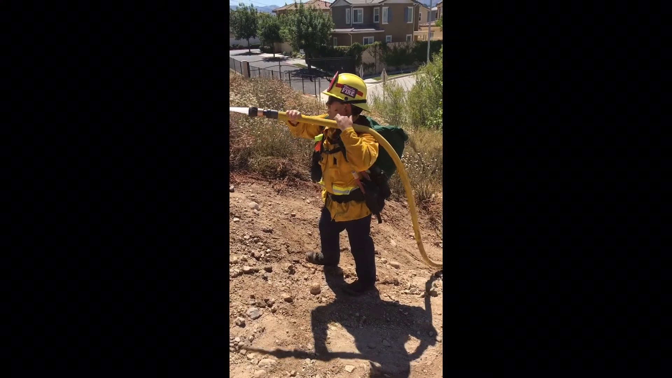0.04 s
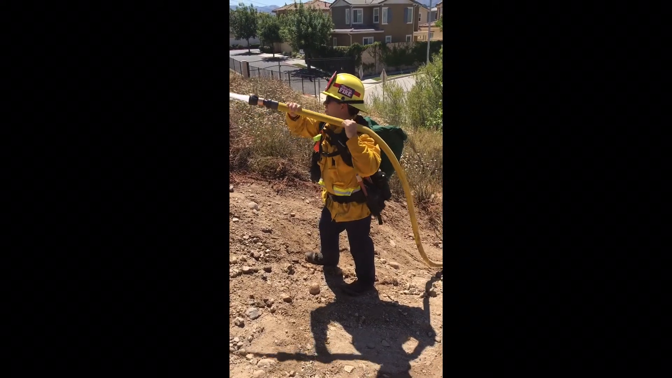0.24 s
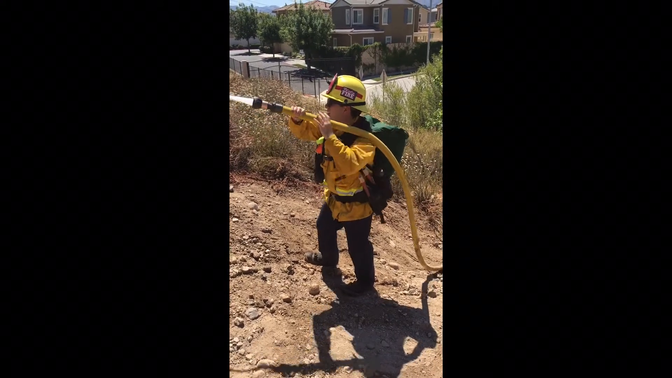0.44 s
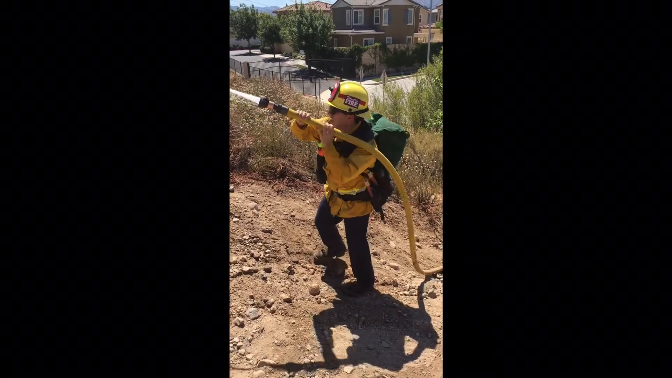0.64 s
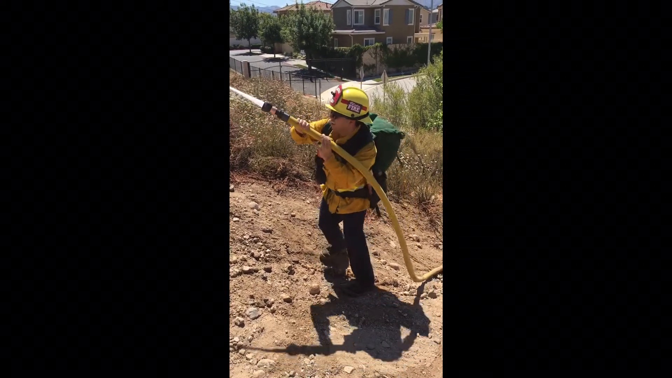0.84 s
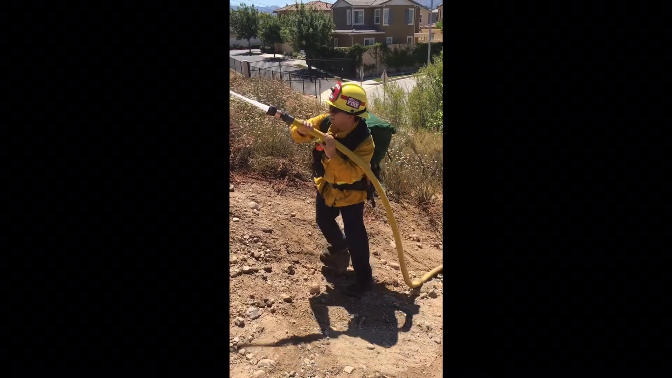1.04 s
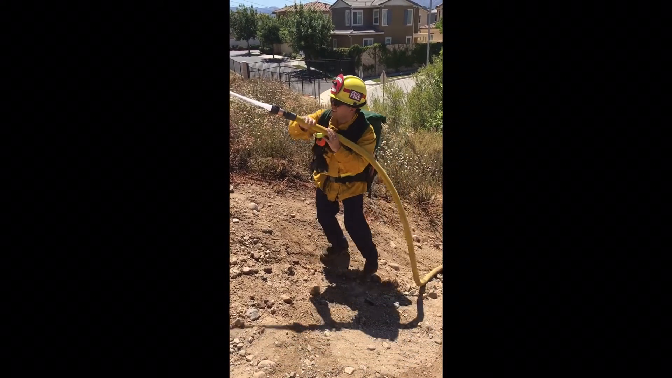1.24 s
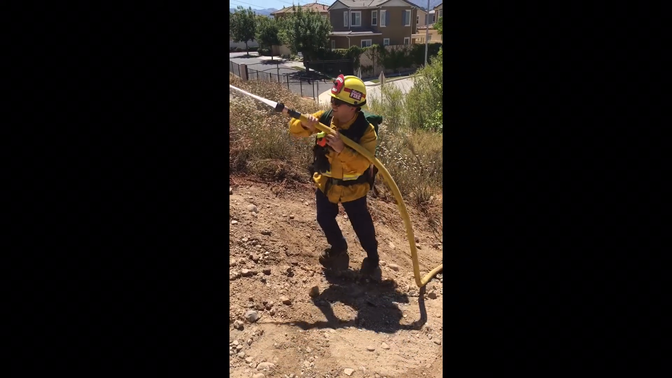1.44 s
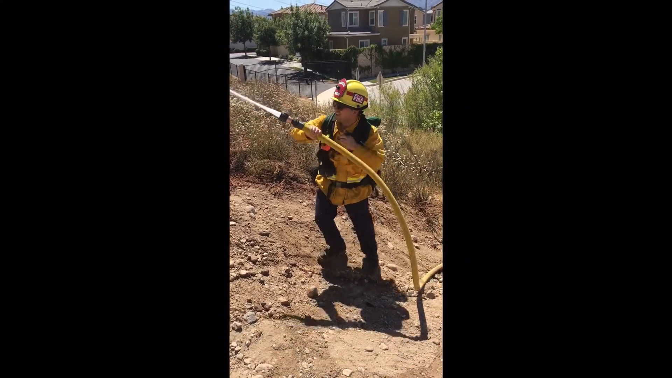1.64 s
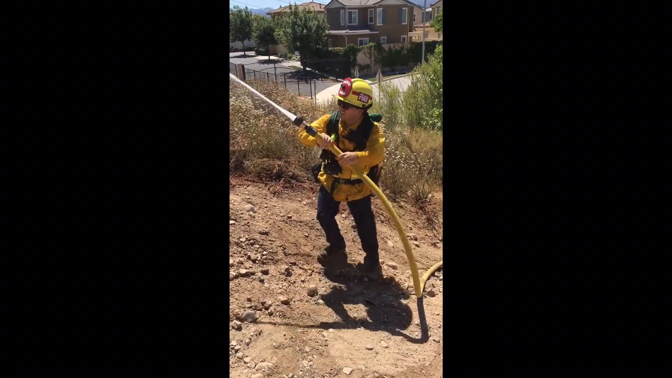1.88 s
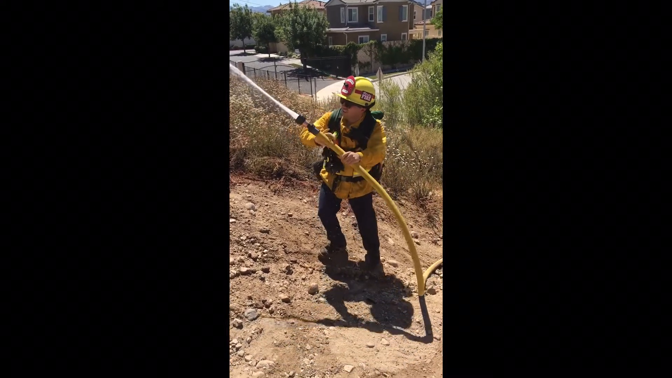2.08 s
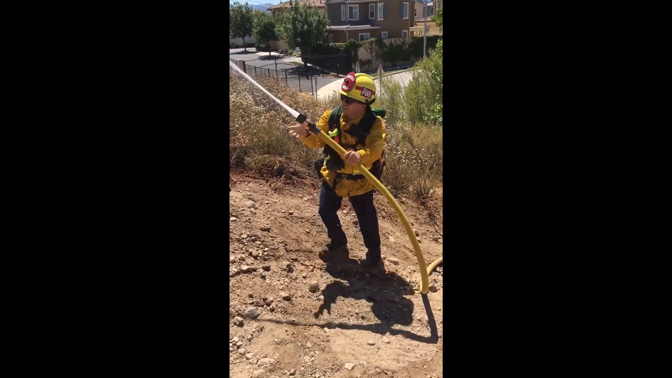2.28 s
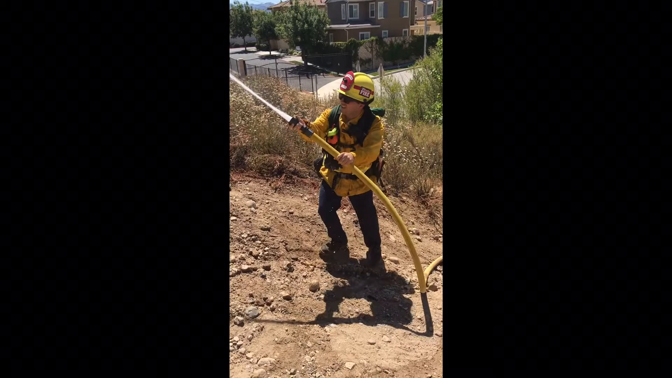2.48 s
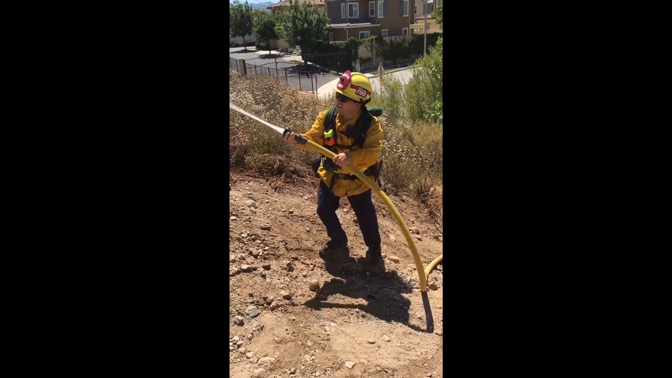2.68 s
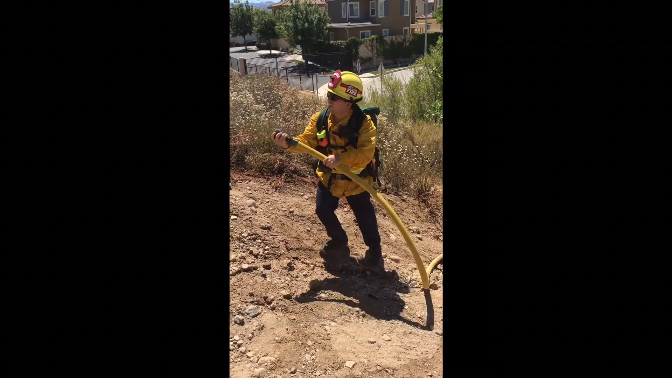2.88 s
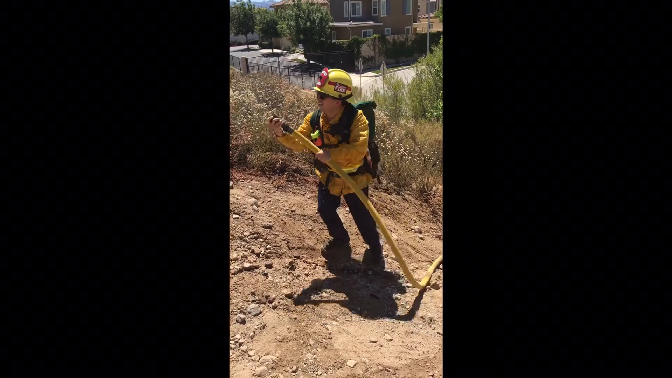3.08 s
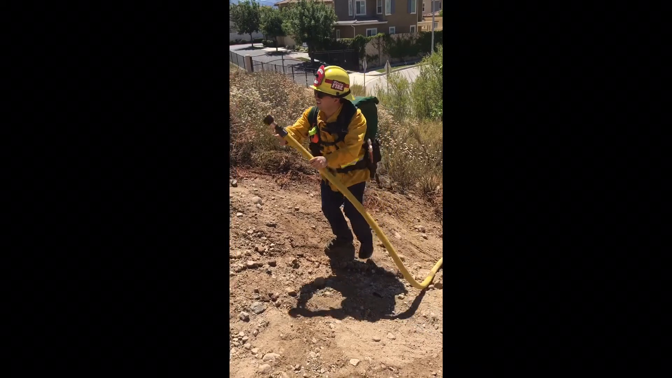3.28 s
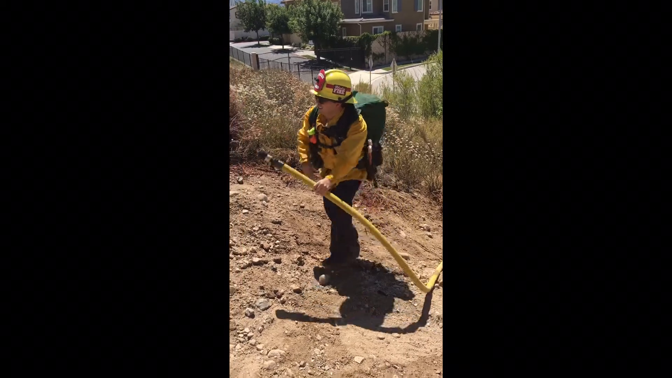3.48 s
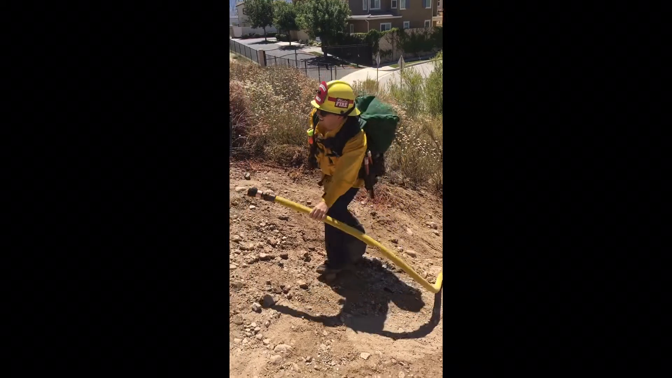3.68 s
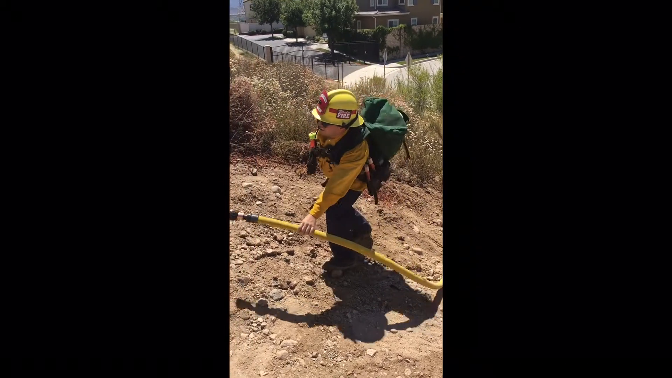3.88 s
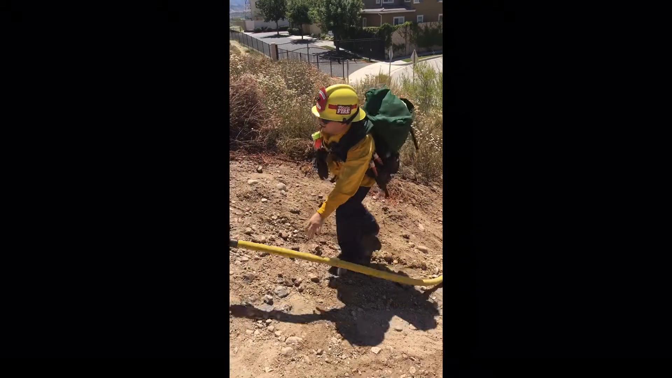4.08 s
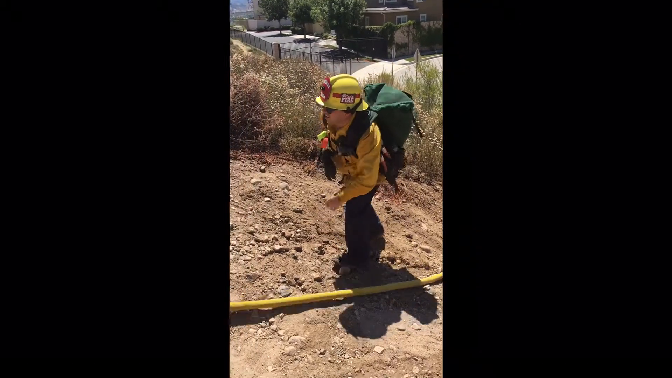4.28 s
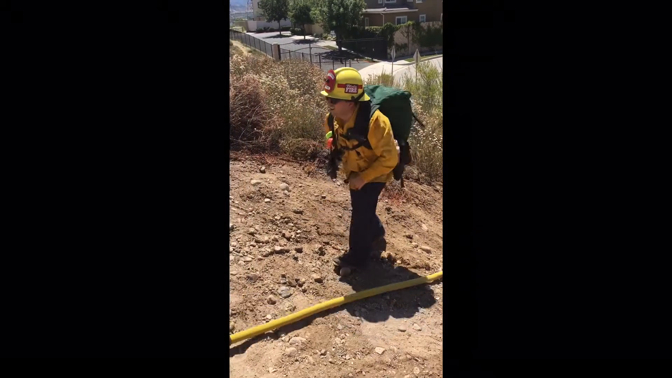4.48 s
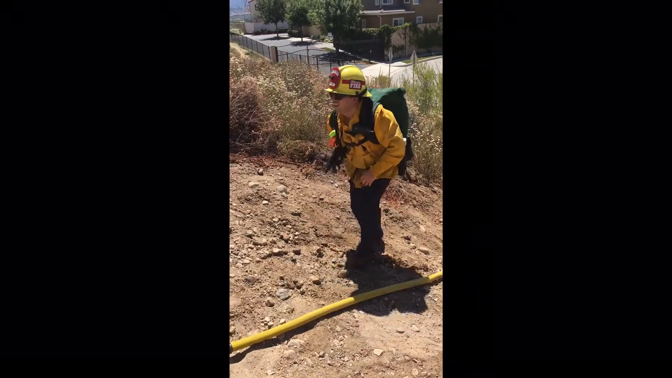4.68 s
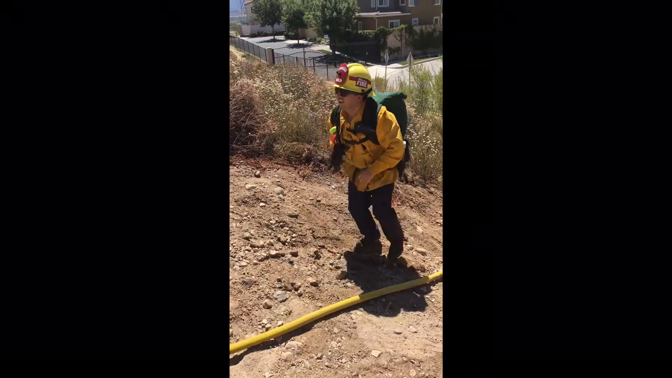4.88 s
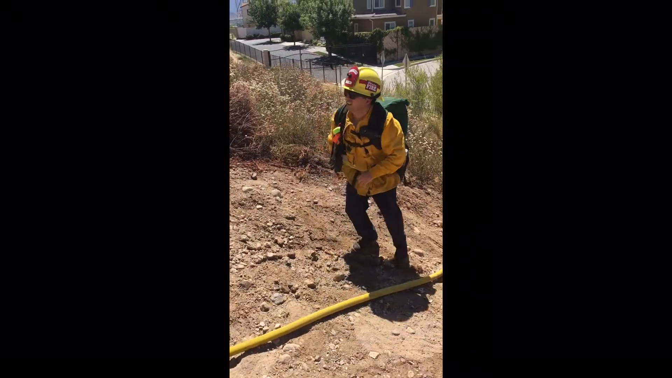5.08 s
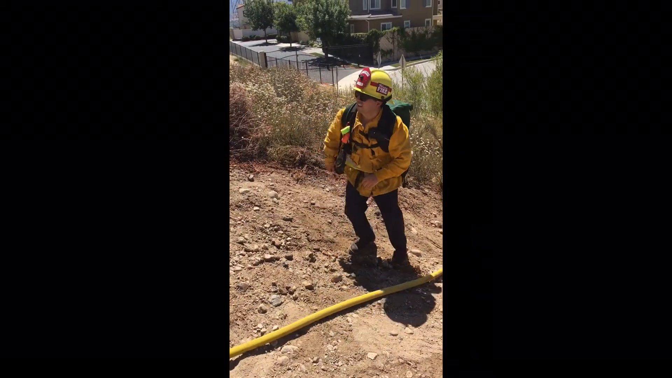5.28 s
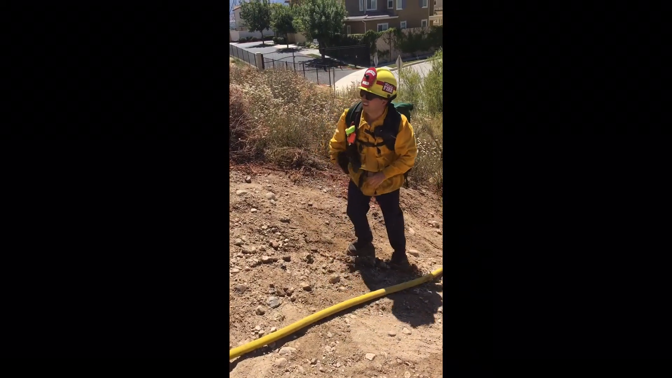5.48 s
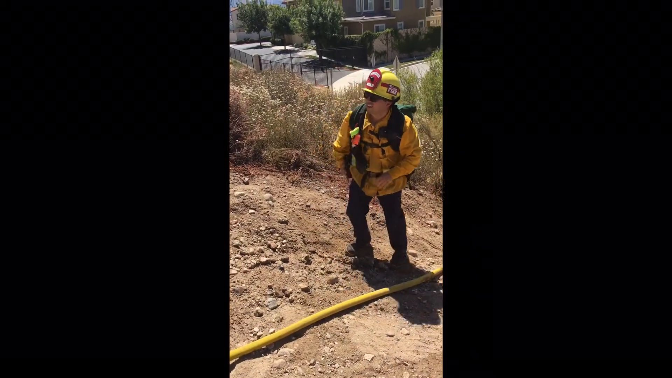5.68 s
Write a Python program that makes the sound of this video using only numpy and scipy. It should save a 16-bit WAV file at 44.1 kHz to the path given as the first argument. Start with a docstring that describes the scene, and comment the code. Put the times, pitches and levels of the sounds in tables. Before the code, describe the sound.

A hose jet hisses steadily from the start, heard through one microphone outdoors on a dry slope. A metal clip clinks at about 0.1 seconds and more brightly at 0.8, and light knocks of gear and stones come through the first 1.2 seconds. Near 2.8 seconds the valve shuts: the hiss thins, splutters briefly and stops. A few faint drops tick on the ground until about 3.4 seconds. From around 3.5 seconds boots scuff and knock through gravel, with soft dragging and rustling clothes. At 4.1 seconds the metal nozzle hits the ground with a sharp, high clank, the loudest sound, ringing briefly until a smaller bounce at 4.3. Uneven gritty steps and small stone knocks continue to the end at about 5.7 seconds. Faint, distant traffic rumbles with a low hum underneath throughout.

```python
"""One microphone by a dry slope. A hose jet hisses as its water tears apart, and in the first second
a metal clip on the gear clinks. Near 2.8 s the valve is shut, the jet splutters and the last drops tick.
Then boots scuff and knock through gravel, clothes rustling; at 4.1 s the nozzle is dropped and rings
until it bounces. The boots carry on to the end. Far traffic rumbles under it all."""
import sys
import numpy as np
from scipy import signal
from scipy.io import wavfile

SR = 44100
rng = np.random.default_rng(int(sys.argv[2]) if len(sys.argv) > 2 else 0)


def output_pcm(signal):
    """Save a mono or channel-first signal as 16-bit PCM at the path in sys.argv[1].

    Samples are clipped to [-1, 1] before scaling.
    """
    pcm = np.clip(np.atleast_2d(signal).T, -1, 1) * 32767
    wavfile.write(sys.argv[1], SR, np.round(pcm).astype(np.int16))


N = 252693

# The jet eases, swells as the valve turns and is shut.
# Each row: time in seconds, level in dB, treble tilt in dB per octave.
JET_CURVE = [(0.0, -36.5, 0.86), (0.71, -37.5, 0.1), (0.87, -39.5, 0), (1.29, -38.5, -0.1),
             (2.15, -39.5, -0.1), (2.47, -40.5, 0.1), (2.632, -39, 0.6), (2.7, -42, 1.5),
             (2.79, -46.5, 0.5), (2.82, -52, 1.5), (2.93, -71, 3.5)]
# The hiss of the water. Each row: frequency in Hz, relative spectral density in dB.
JET_SPECTRUM = [(88, -52), (150, -12), (270, 3), (406, -7.5), (637, -1.5), (941, -2.5), (1140, -2.5),
                (1530, -1.5), (1660, -2.5), (2980, -5), (4950, -10), (9630, -10), (16000, -12.5)]
# Humps and hollows in that hiss. Each row: centre in Hz, width in Hz, gain in dB.
JET_HUMPS = [(1170, 150, 2.5), (1690, 100, 2.5), (2300, 120, 2.5), (3000, 200, 3), (5200, 900, -2.5),
             (6500, 1300, 3.5), (8100, 900, -4), (9500, 1200, 3.5)]
# Blows on the metal clip. Each row: start in seconds, strength in dB, hardness in dB per octave,
# factor on the ringing time.
CLIP_BLOWS = [(0.056, -32, -14, 0.2), (0.0615, -23, -10, 0.63), (0.065, -23, -10, 0.5),
              (0.083, -26, -5, .3), (0.802, -10.5, 9, 0.85), (0.8077, -23, -1, 1.9),
              (0.8119, -17, -3.5, 1.5)]
CLIP_MODES = [(3015, -25, .06), (3900, -10, .02), (4290, -30, .12), (4370, -21, .19), (6032, -9, .09),
              (12260, -23, .14), (8590, -13, .11), (8918, -12, .1), (12945, -6, .05), (13123, -3, .085),
              (15440, -13, .08)]
# Last drops on the dry ground. Each row: start in seconds, peak in dB, band centre in Hz.
LAST_DROPS = [(2.8913, -41, 12000), (2.937, -36.5, 9380), (2.9602, -45, 3700), (2.9685, -37, 11000),
              (3.051, -43.5, 3090), (3.0893, -32.5, 6260), (3.1047, -48.5, 9100), (3.122, -46, 2400),
              (3.188, -44, 4470), (3.246, -43.5, 2600), (3.2844, -62, 8930), (3.3104, -42, 10900),
              (3.349, -44, 5050), (3.373, -50, 5430)]
# The jet's last splutter as the valve shuts (2.795 s), then boots, hose and cloth dragging on gravel.
# Each row: loudest moment in seconds, dull part in dB, bright part in dB, build-up and fade in seconds.
SPLUTTER_AND_DRAGS = [(2.795, -46.5, -62, 0.022, 0.022), (3.111, -54, -57, 0.027, .015),
                      (3.455, -50, -70, 0.04, .04), (3.516, -40, -55, 0.047, 0.13),
                      (3.63, -43.5, -45, 0.015, 0.09), (3.71, -60, -52, 0.067, .03),
                      (3.862, -51.5, -54.5, 0.04, .1), (3.959, -51.5, -53, 0.064, .1),
                      (4.098, -50.5, -51, .12, 0.039), (4.183, -45.5, -44.5, 0.027, 0.14),
                      (4.31, -47.5, -51.5, 0.044, 0.078), (4.455, -44.5, -45.5, 0.041, 0.026),
                      (4.55, -48.5, -50.5, 0.08, 0.037), (4.654, -44, -52, 0.067, 0.035),
                      (4.74, -42, -64, 0.0076, .06), (4.8, -60, -52.5, 0.047, 0.049),
                      (4.9, -52.5, -51.5, 0.0089, 0.22), (4.986, -43.5, -38.5, 0.0086, 0.045),
                      (5.076, -51.5, -51, 0.02, 0.13), (5.17, -58, -47.5, 0.13, 0.44),
                      (5.286, -39, -46.5, 0.056, .02), (5.379, -41.5, -49, 0.12, 0.022),
                      (5.44, -54.5, -53, 0.047, 0.11), (5.566, -45.5, -49, 0.067, .015),
                      (5.64, -45, -52.5, 0.084, 0.098), (5.696, -50.5, -52, 0.081, 0.043)]
# Their dull part. Each row: frequency in Hz, relative spectral density in dB.
DULL_SPECTRUM = [(180, -39), (300, 0), (345, -4.5), (438, -14), (587, 1), (1030, -9), (1130, -2.5),
                 (4000, -22), (5200, -48), (8800, -120)]
# Their bright part. Each row: frequency in Hz, relative spectral density in dB.
BRIGHT_SPECTRUM = [(1180, -35), (2000, -3.5), (4010, -9), (4610, -9), (7570, -8.5), (8190, -5.5),
                   (13700, -14.5), (16000, -10)]
# Knocks of stones, soles and gear, and at 4.655 s the rough edge of a boot's scuff on gravel. Each row:
# start in seconds, crack peak in dB, crack pitch in Hz, opening rms of the thud in dB, thud pitch in Hz.
KNOCKS_AND_SCUFF_EDGE = [(0.0769, -25, 1840, -42, 1120), (0.158, -34, 2860, -40, 1150),
                         (0.2077, -19, 2500, -39, 1230), (0.3325, -24, 1820, -44, 1140),
                         (0.3366, -23.5, 2010, -43, 1470), (0.733, -28, 1690, -54, 1130),
                         (1.0498, -24, 1840, -43, 1280), (1.1956, -25, 2730, -32.5, 1290),
                         (1.2217, -28, 2220, -38, 1080), (3.5018, -41, 1540, -60, 1240),
                         (3.6167, -35, 1990, -35, 151), (3.724, -35, 5660, -59, 269),
                         (3.8659, -28.5, 5590, -51, 191), (3.9528, -32, 1640, -57, 1200),
                         (4.1226, -0.5, 10100, -27.5, 1120), (4.2882, -14.5, 2470, -44, 690),
                         (4.2979, -25, 1900, -33.5, 312), (4.3355, -33, 1960, -53, 236),
                         (4.4356, -34, 2040, -41, 1470), (4.4589, -29, 2880, -48, 225),
                         (4.575, -35, 1440, -35.5, 232), (4.655, -34, 2020, -44.5, 1300),
                         (4.7407, -47, 2140, -40.5, 690), (4.7776, -31, 2250, -60, 167),
                         (4.8164, -35, 7000, -57, 151), (4.8953, -29, 3270, -49, 1240),
                         (4.9196, -29.5, 2100, -54, 191), (4.9796, -34, 2430, -48, 151),
                         (5.1271, -28.5, 3300, -51, 1180), (5.2823, -37, 1520, -38, 724),
                         (5.3756, -43, 1930, -41.5, 580), (5.4202, -37, 3240, -46.5, 643),
                         (5.543, -33, 7460, -41.5, 600), (5.5624, -46, 1690, -43, 246),
                         (5.658, -39, 2390, -44.5, 223), (5.6985, -30, 9280, -44.5, 214)]
# Soft hollow bumps. Each row: start in seconds, peak in dB, pitch in Hz, t60 in seconds.
HOLLOW_BUMPS = [(.062, -31, 1140, .04), (.076, -30.5, 1116, 0.11), (.158, -28, 1144, 0.039),
                (.21, -33, 1143, .04), (0.964, -32, 70, 0.1), (1.171, -53, 90, 0.095),
                (1.196, -30.5, 232, 0.032), (3.617, -38, 140, 0.053), (3.617, -31.5, 690, 0.03),
                (4.123, -20, 720, 0.022), (4.5752, -17.5, 1120, 0.006), (4.918, -32, 182, 0.047),
                (5.376, -25.5, 614, 0.023)]
# Modes of the nozzle. Each row: frequency in Hz, peak in dB, t60 in seconds.
NOZZLE_MODES = [(4000, -13, .012), (4440, -26, .045), (5600, -13, .018), (8100, -19, .015),
                (10760, -8, .018), (11320, -14, .03), (10173, -23, .36), (12495, -7, .04)]
# Traffic and air in the distance. Each row: frequency in Hz, relative spectral density in dB.
TRAFFIC_SPECTRUM = [(21, -42), (35, -8.5), (86, -3), (370, -18.5), (466, -21), (587, -16.5), (758, -23),
                    (1230, -25.5), (2730, -36.5), (8870, -41), (10300, -31), (11500, -41.5), (16000, -46.5)]
# Dips of the microphone housing. Each row: centre in Hz, width in Hz, gain in dB.
HOUSING_DIPS = [(440, 304, -6.5), (5000, 180, -8.5), (10450, 260, -5)]

SLOPE_ECHO_S, SLOPE_ECHO_GAIN = .00172, .33
SWELL_DB = 12   # a splutter or drag gains this much over its build-up and loses it over its fade
RUSTLE_START_S, RUSTLE_RISE_S, RUSTLE_DULL_DB, RUSTLE_BRIGHT_DB = 3.3, 0.19, -68.5, -60
CRACK_T60_S, THUD_T60_S = .024, 0.033
NOZZLE_HIT_S, NOZZLE_BOUNCE_S = 4.1222, 4.288
TRAFFIC_DB, HUM_DB, HUM_HZ, HUM_WIDTH_HZ = -49, -57, 59, 16
LOW_CUT_HZ, HIGH_CUT_HZ = 38, 15750


def hose_jet():
    """Torn water hisses; the slope's echo reaches the microphone a moment later, combing the sound."""
    level_db, tilt_db = in_time(JET_CURVE)
    spray = grains(per_s=1500, spread_db=3.2, share=0.22)
    spray = coloured(spray, JET_SPECTRUM, flicker_db=0.86, flicker_hz=8.3, tilt_db=tilt_db)
    hiss = from_db(level_db) * shape(spray, JET_HUMPS)
    hiss[round(JET_CURVE[-1][0] * SR):] = 0   # valve shut
    delayed = np.interp(np.arange(N) - SLOPE_ECHO_S * SR, np.arange(N), hiss)
    echo = signal.lfilter([.45], [1, -.55], delayed)   # comes back duller
    return hiss + SLOPE_ECHO_GAIN * echo


def clip_clinks():
    out, noises = np.zeros(N), rng.standard_normal((len(CLIP_BLOWS), 1000))
    click = signal.unit_impulse(12000)
    for (start, strength_db, hardness, ring_factor), noise in zip(CLIP_BLOWS, noises):
        for hz, level_db, t60 in CLIP_MODES:
            gain = from_db(strength_db + level_db + hardness * np.log2(hz / 9000))
            add(out, start, gain * ring(click, hz, ring_factor * t60))
        add(out, start, from_db(strength_db + 2) * burst(noise, t60=0.039, low_hz=1700, high_hz=14500))
    return out


def dropped_nozzle():
    """One blow rings the metal until the ground stops it on the bounce."""
    click = signal.unit_impulse(round((NOZZLE_BOUNCE_S - NOZZLE_HIT_S) * SR))
    out = np.zeros(N)
    for hz, peak_db, t60 in NOZZLE_MODES:
        add(out, NOZZLE_HIT_S, from_db(peak_db) * ring(click, hz, t60))
    return out


def knocks_and_scuff_edge():
    """A knock or a scuff's rough edge is a bright crack and a duller thud; bumps ring at one pitch."""
    out, noises = np.zeros(N), rng.standard_normal((len(KNOCKS_AND_SCUFF_EDGE), 2, 4000))
    for (start, crack_db, crack_hz, thud_db, thud_hz), noise in zip(KNOCKS_AND_SCUFF_EDGE, noises):
        crack = burst(noise[0], CRACK_T60_S, crack_hz / 3.8, crack_hz * 3.24)
        add(out, start, from_db(crack_db) * crack)
        thud = burst(noise[1], THUD_T60_S, thud_hz / 1.39, thud_hz * 2.03)
        opening_rms = np.sqrt(np.mean(thud[:400] ** 2))
        add(out, start, from_db(thud_db) * thud / opening_rms)
    for start, peak_db, hz, t60 in HOLLOW_BUMPS:
        add(out, start, -from_db(peak_db) * ring(signal.unit_impulse(6000), hz, t60))
    return out


def splutter_and_drags():
    """The jet's last splutter, then each drag on gravel, swells and fades; clothes and pack rustle."""
    t = np.arange(N) / SR
    rustle = np.clip((t - RUSTLE_START_S) / RUSTLE_RISE_S, 0, 1)
    dull_gain, bright_gain = from_db(RUSTLE_DULL_DB) * rustle, from_db(RUSTLE_BRIGHT_DB) * rustle
    for peak_s, dull_db, bright_db, build_s, fade_s in SPLUTTER_AND_DRAGS:
        swell = from_db(-SWELL_DB * np.maximum((peak_s - t) / build_s, (t - peak_s) / fade_s))
        dull_gain = np.hypot(dull_gain, from_db(dull_db) * swell)   # powers add
        bright_gain = np.hypot(bright_gain, from_db(bright_db) * swell)
    dull = grains(per_s=600, spread_db=4.0, share=.55)
    dull = coloured(dull, DULL_SPECTRUM, flicker_db=1.5, flicker_hz=25)
    bright = grains(per_s=1500, spread_db=4.6, share=.45)
    bright = coloured(bright, BRIGHT_SPECTRUM, flicker_db=1.2, flicker_hz=25)
    return dull_gain * dull + bright_gain * bright


def water_drops():
    """Each drop bursts on the dry ground as a tiny broad tick."""
    out, noises = np.zeros(N), rng.standard_normal((len(LAST_DROPS), 1000))
    for (start, peak_db, hz), noise in zip(LAST_DROPS, noises):
        add(out, start, from_db(peak_db) * burst(noise, t60=0.024, low_hz=hz / 2, high_hz=hz * 2))
    return out


def far_traffic():
    """Traffic and air rumble a long way off, with a wavering low hum."""
    rumble = coloured(rng.standard_normal((2, N)), TRAFFIC_SPECTRUM, flicker_db=1.0, flicker_hz=4.3)
    hum = band(rng.standard_normal(N), HUM_HZ - HUM_WIDTH_HZ / 2, HUM_HZ + HUM_WIDTH_HZ / 2)
    return from_db(TRAFFIC_DB) * rumble + from_db(HUM_DB) * rms_one(hum)


def grains(per_s, spread_db, share):
    """Two rows of white noise with random clicks of uneven size, which carry `share` of the power."""
    sizes = from_db(spread_db * np.minimum(rng.exponential(1, (2, N)), 5))
    signs = rng.choice([-1, 1], (2, N))
    clicks = rms_one(sizes * signs * (rng.random((2, N)) < per_s / SR))
    return np.sqrt(1 - share) * rng.standard_normal((2, N)) + np.sqrt(share) * clicks


def coloured(white, spectrum, flicker_db, flicker_hz, tilt_db=np.zeros(N)):
    """Third-octave bands, each with its own level and flicker, tilted about 3 kHz; rms 1."""
    hz, level_db = np.transpose(spectrum)
    edges = 20 * 2 ** np.arange(0, 10, 1 / 3)
    tilt_db = tilt_db[::40]   # gains move every 40 samples
    out, common_drift = 0, drift(flicker_hz)
    for k, (low, high) in enumerate(zip(edges, edges[1:])):
        centre = np.sqrt(low * high)
        band_db = np.interp(np.log(centre), np.log(hz), level_db)
        if high < hz[0] or low > hz[-1] or band_db < -50:
            continue
        waver_db = flicker_db * (0.6 * common_drift + drift(flicker_hz))[:len(tilt_db)]
        gain = from_db(band_db + waver_db + tilt_db * np.log2(centre / 3000))
        out = out + np.repeat(gain, 40)[:N] * band(white[k % 2], low, high)
    return rms_one(out)


def drift(hz):
    """Slow low-passed noise, one value every 40 samples; rms 1."""
    pole = np.exp(-2 * np.pi * hz * 40 / SR)
    noise = rng.standard_normal(N // 40 + 2002)
    return rms_one(signal.lfilter([1], [1, -2 * pole, pole * pole], noise)[2000:])


def burst(noise, t60, low_hz, high_hz):
    """A snap followed by dying band noise; peak 1."""
    puff = noise * from_db(-60 * np.arange(len(noise)) / SR / t60)
    puff[0] = 6.8   # the snap
    puff = band(band(puff, low_hz, high_hz), low_hz / 2, high_hz * 2.13)
    return puff / np.abs(puff).max()


def ring(click, hz, t60):
    """A unit click sets a sine of height 1 ringing."""
    decay, angle = from_db(-60 / (t60 * SR)), 2 * np.pi * hz / SR
    return signal.lfilter([0, np.sin(angle)], [1, -2 * decay * np.cos(angle), decay ** 2], click + 1e-18)


def shape(x, humps):
    """A chain of peaks and dips."""
    for hz, width_hz, gain_db in humps:
        radius, angle = np.exp(-np.pi * width_hz / SR), 2 * np.pi * hz / SR
        scale = (1 - radius ** 2) / 2
        resonance = signal.lfilter([scale, 0, -scale], [1, -2 * radius * np.cos(angle), radius ** 2], x)
        x = x + (from_db(gain_db) - 1) * resonance
    return x


def band(x, low_hz, high_hz):
    """Band-pass."""
    sos = signal.butter(2, [low_hz, min(high_hz, .45 * SR)], "band", fs=SR, output="sos")
    return signal.sosfilt(sos, x)


def in_time(rows):
    """Columns of a curve table, sample by sample."""
    times, *columns = np.transpose(rows)
    return [np.interp(np.arange(N) / SR, times, column) for column in columns]


def add(out, start_s, sound):
    """Mix a sound in at its start time."""
    i = round(start_s * SR)
    out[i:i + len(sound)] += sound[:N - i]


def from_db(db):
    """Decibels to gain."""
    return 10 ** (np.asarray(db) / 20)


def rms_one(x):
    """Scale to rms 1."""
    return x / np.sqrt(np.mean(x ** 2) + 1e-20)


def scene():
    """All sources, heard from one spot by the slope."""
    mono = (hose_jet() + splutter_and_drags() + knocks_and_scuff_edge() + water_drops()
            + clip_clinks() + dropped_nozzle() + far_traffic())
    return np.array([mono, mono])


def record(dry):
    """One microphone on both channels: bass cut, housing dips, clipping at full scale, steep top cut."""
    low_cut = signal.butter(2, LOW_CUT_HZ, "high", fs=SR, output="sos")
    high_cut = signal.ellip(12, .5, 90, HIGH_CUT_HZ, fs=SR, output="sos")
    housed = shape(signal.sosfilt(low_cut, dry[0]), HOUSING_DIPS)
    mono = signal.sosfilt(high_cut, np.clip(housed, -1, 1))
    return np.array([mono, mono])


dry = scene()
out = record(dry)
output_pcm(out)
```